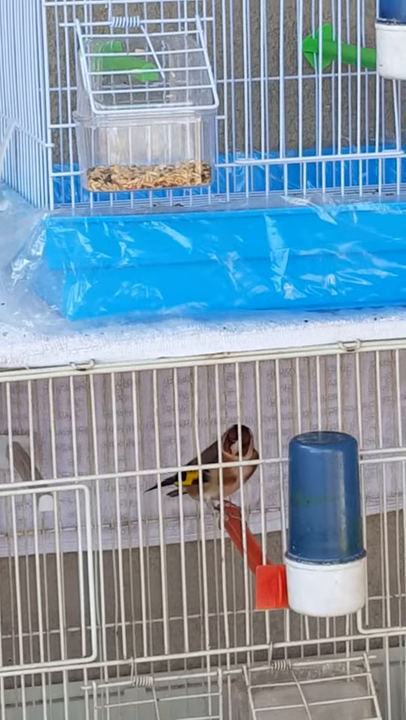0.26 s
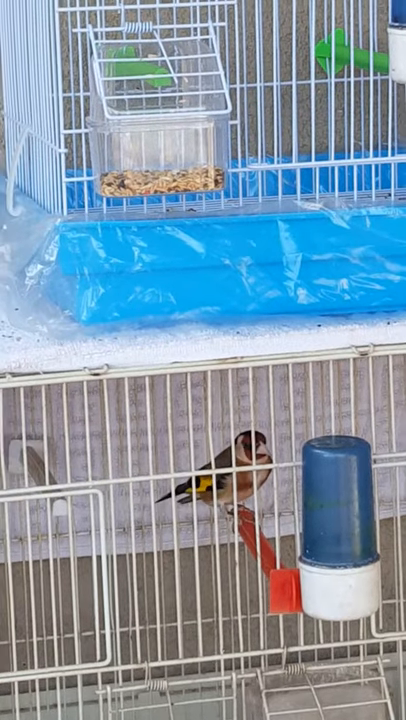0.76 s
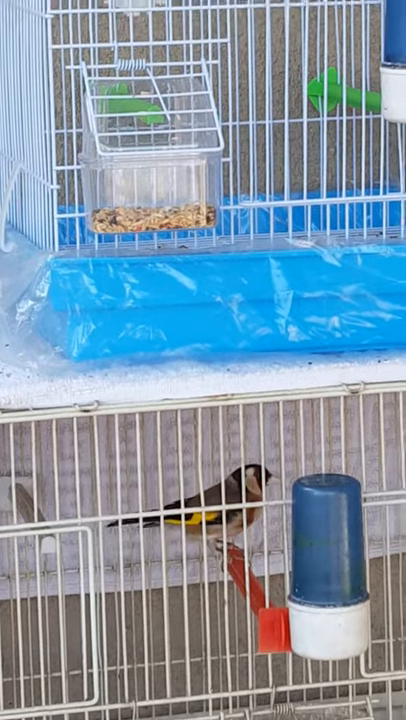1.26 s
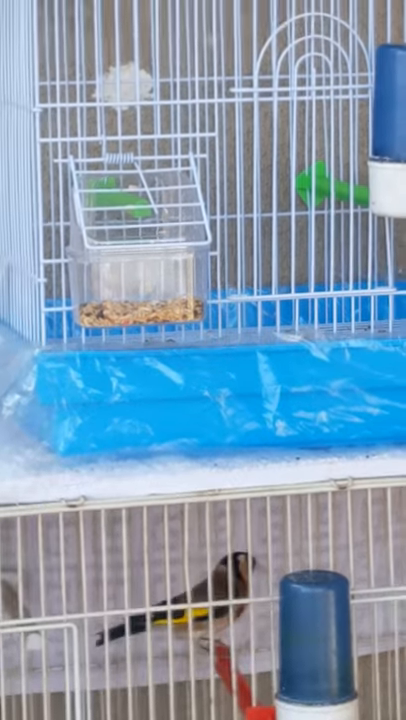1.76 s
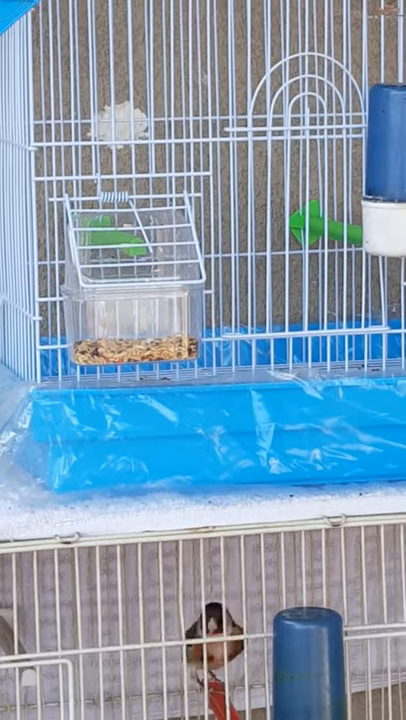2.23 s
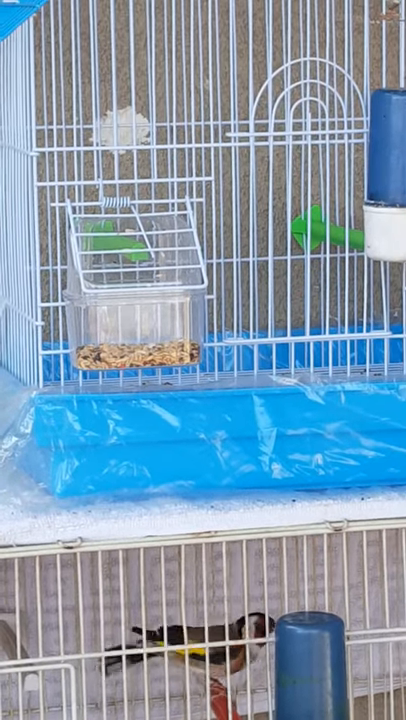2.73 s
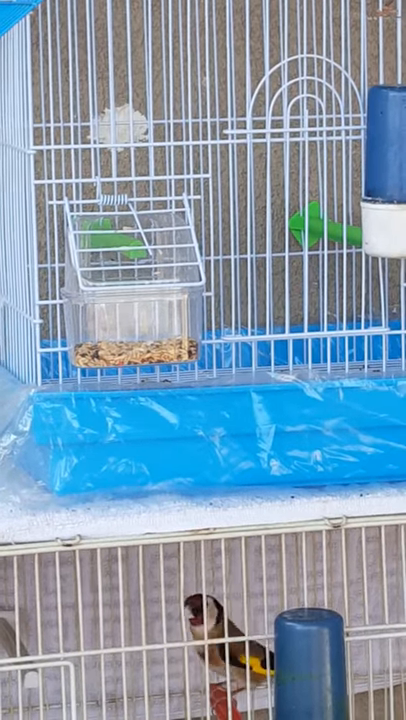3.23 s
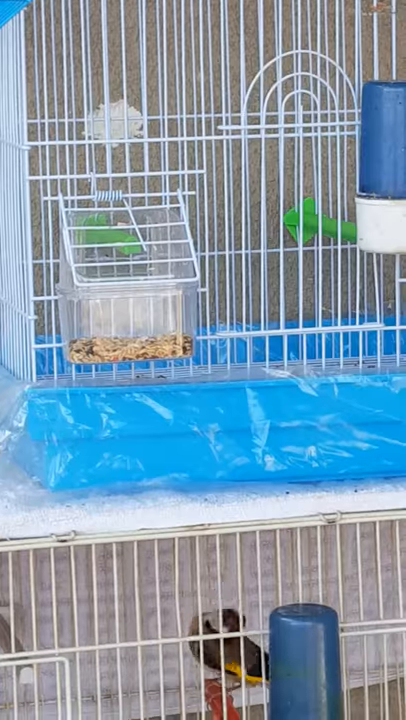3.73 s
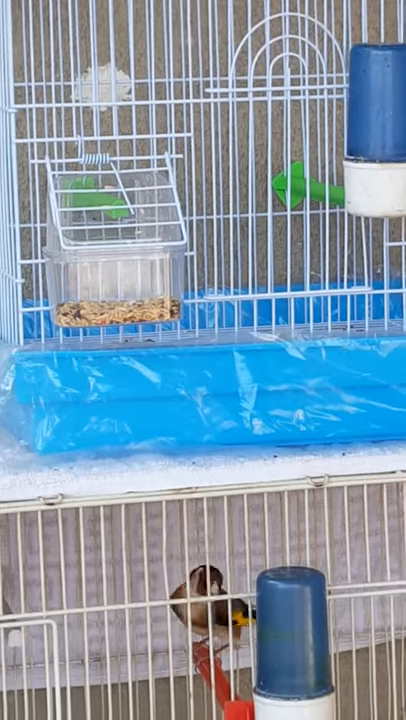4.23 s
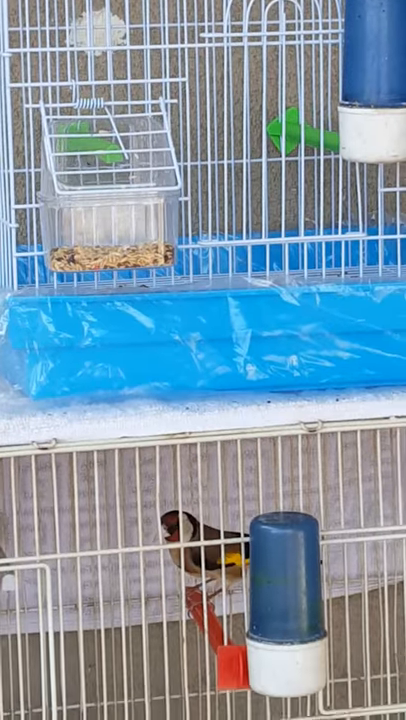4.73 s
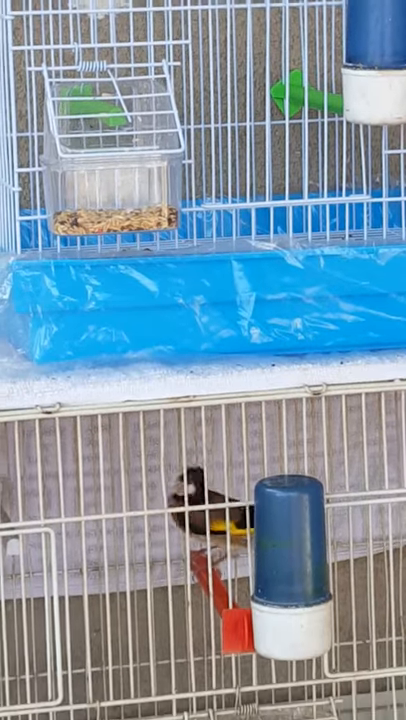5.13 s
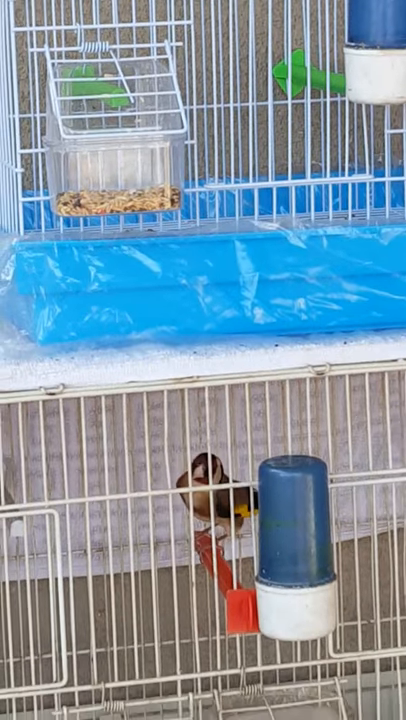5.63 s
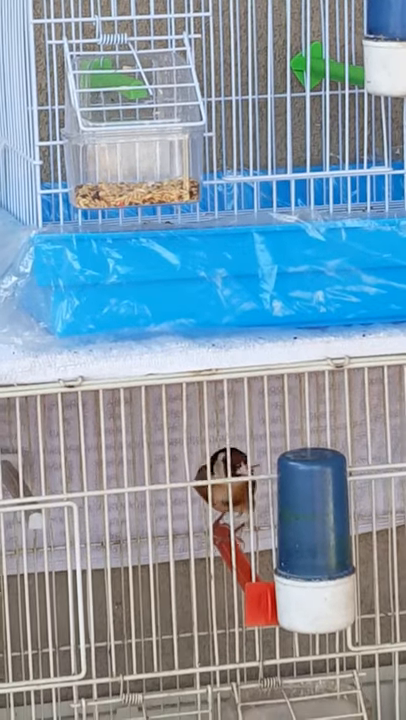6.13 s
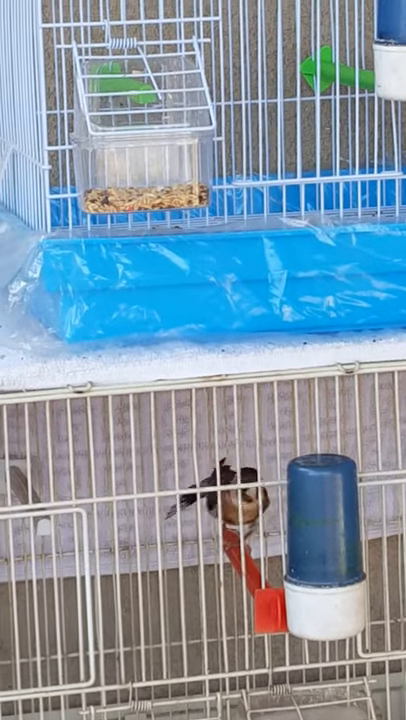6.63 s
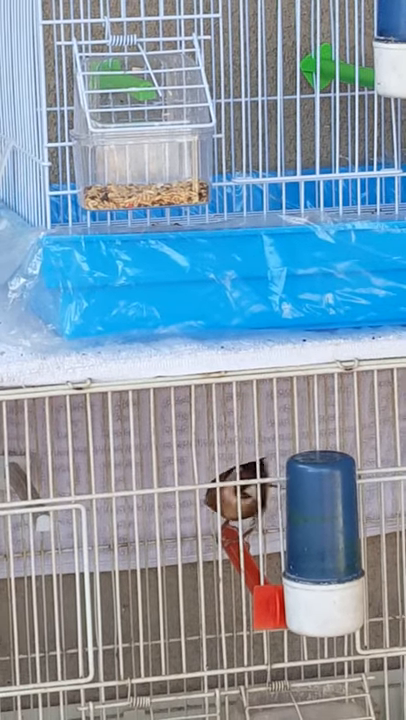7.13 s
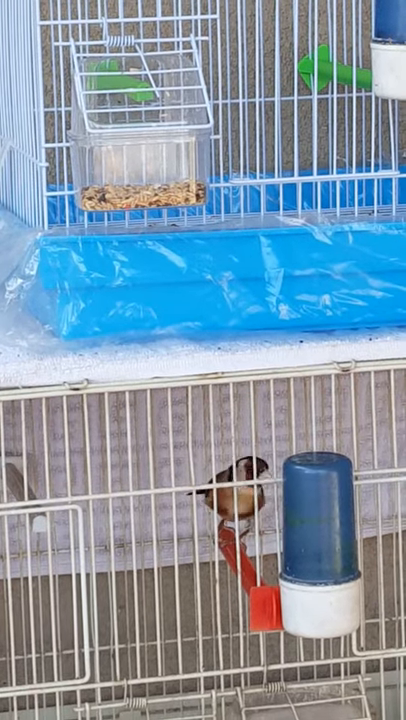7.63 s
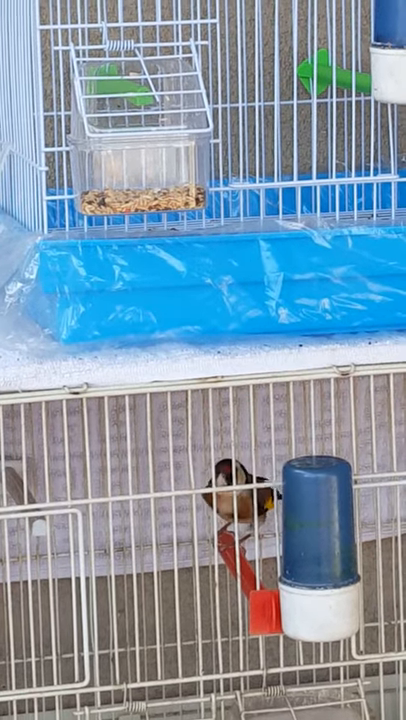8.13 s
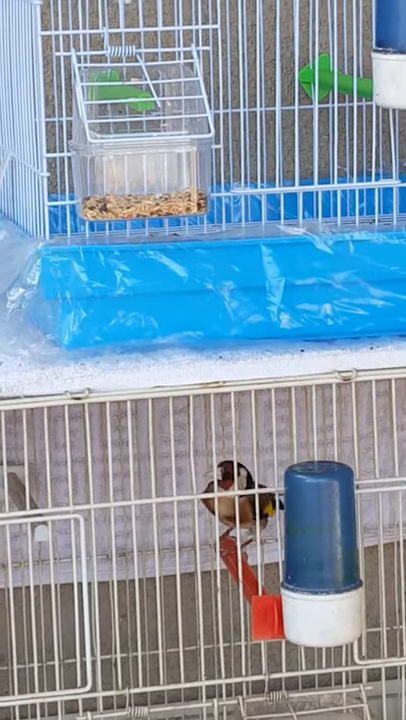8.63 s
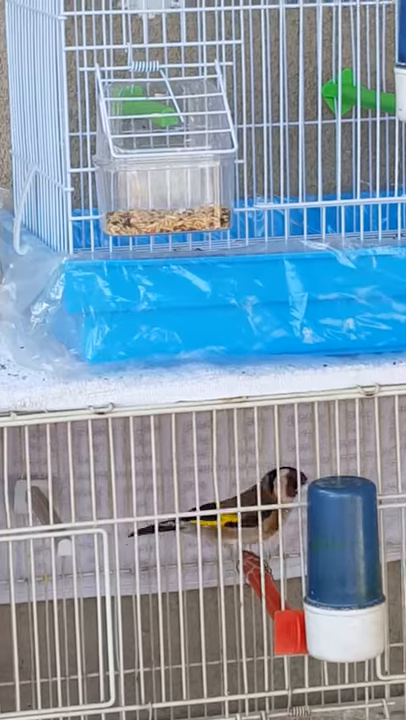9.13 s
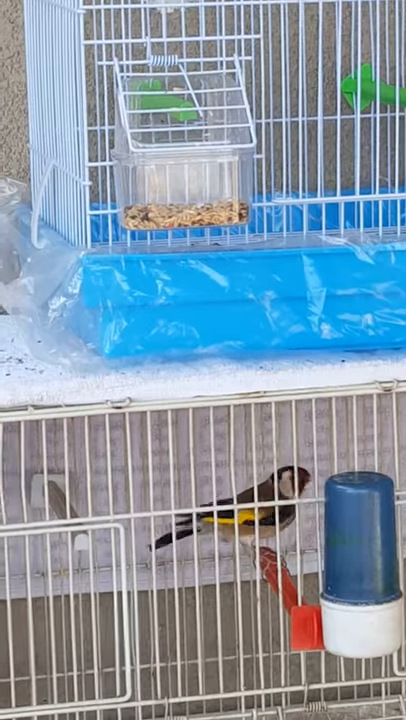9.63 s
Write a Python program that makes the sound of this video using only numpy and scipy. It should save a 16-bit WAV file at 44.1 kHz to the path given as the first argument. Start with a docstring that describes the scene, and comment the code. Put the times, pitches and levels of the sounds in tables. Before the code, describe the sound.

Sharp chirps and raspy squeaks from a small finch indoors, with faint cage ticks over a low hum and hiss.

```python
"""A caged goldfinch gives four bright twitters and two creaking phrases in a hard-walled room.
Each phrase ends in a whine, in which the two sides of the syrinx sound together and modulate each
other, producing sum and difference tones. Reflections from near walls smear every note.
Claws and beak excite ticks in the cage, and a plucked bar rings in its normal modes. Far birds and
rustles arrive as diffuse sound, over a steady rush, hiss, hum and deep rumble."""
import sys
import numpy as np
from scipy import signal
from scipy.fft import rfft, irfft, next_fast_len
from scipy.io import wavfile

SR = 44100
rng = np.random.default_rng(int(sys.argv[2]) if len(sys.argv) > 2 else 0)


def dump_mix(stems):
    """Bounce the given channels to the path in sys.argv[1] as a 16-bit WAV at rate SR."""
    frames = np.atleast_2d(stems).T  # one column per channel
    limited = np.clip(frames, -1, 1)  # hard clip at full scale
    pcm = np.round(limited * 32767).astype(np.int16)
    wavfile.write(sys.argv[1], SR, pcm)


N = 435266
TIME = np.arange(N) / SR

# spectra of the rush (in phase and in antiphase at the two ports), hiss and rumble: f/Hz, density/dB
RUSH_IN_PHASE = [(15, -35), (25, -10.5), (49, 0), (75, -11), (102, 3), (129, -4.5), (167, 1), (266, -3.5),
                 (316, -3), (437, -9), (476, -7), (575, -9), (1030, -7.5), (1500, -14), (1950, -41.5),
                 (3300, -120)]
RUSH_ANTIPHASE = [(15, -44), (25, -16.5), (113, -4.5), (236, -5), (280, -3), (460, -4.5), (1180, 0.5),
                  (1500, -5), (1950, -16.5), (3300, -120)]
HISS_SPECTRUM = [(880, -43), (1500, 1.5), (2480, -3.5), (2740, -6), (4390, -11), (5240, -14), (5620, -13.5),
                 (6020, -18.5), (7620, -23), (9190, -29.5), (15800, -25.5)]
RUMBLE_SPECTRUM = [(15, -4), (26, -1), (48, 15.5), (62, 8.5), (78, -6.5), (105, -3.5), (135, -8), (180, -3),
                   (300, -36.5)]
# slow envelopes of hiss and rumble: t/s, level/dB
HISS_LEVEL = [(0, -58.5), (2.4, -59), (4.2, -57), (5.6, -59), (7.5, -57), (8.6, -60), (9.87, -57.5)]
RUMBLE_LEVEL = [(0, -62.5), (2.5, -64), (5.5, -59.5), (7.4, -56.5), (8.2, -59.5), (9.87, -59)]
# hum of the building: f/Hz, phase wander rate/Hz, level/dB
HUM_PARTIALS = [(51, 8, -77), (114.7, 8.3, -72), (173.6, 7.1, -73.5)]
# whistles of distant birds: t/s, duration/s, start f/Hz, end f/Hz, level/dB
FAR_WHISTLES = [(0.021, 1.8, 5630, 5560, -74.5), (0.376, 0.25, 4170, 4310, -66),
                (2.415, 0.22, 4290, 4210, -64.5), (3.772, 0.73, 6880, 6450, -70),
                (5.33, 0.15, 3010, 3070, -58.5), (6.498, 0.14, 2970, 3030, -57)]
# distant rustles: t/s, duration/s, centre f/Hz, level/dB
RUSTLES = [(0.729, 0.16, 2120, -55), (1.215, 0.6, 4200, -69.5), (3.876, 0.57, 4700, -70.5),
           (7.455, 0.5, 3950, -62)]
# ticks on perch and bars, and plucks of a bar: t/s, level/dB
TICKS = [(1.476, -49.5), (1.6876, -48.5), (2.3411, -49), (3.22, -41), (4.2318, -52), (6.224, -58),
         (8.4068, -57), (9.0957, -53), (9.1303, -45), (9.1894, -57)]
PLUCKS = [(1.477, -51), (4.202, -52.5)]
# spectra of a tick and of the rasp in the voice: f/Hz, density/dB
TICK_SPECTRUM = [(1000, -24), (2400, -3), (4800, -10), (7500, 0), (10500, -7.5), (13000, -12),
                 (16000, -13.5)]
RASP_SPECTRUM = [(2000, -16.5), (4500, 3), (7500, -4), (10500, -4), (15000, -6.5)]
# normal modes of a cage bar: f/Hz, relative level/dB, T60/s
BAR_MODES = [(1436, -4, .08), (2366, 3, .1), (3530, -4, 0.11), (5030, -11, .07), (5250, -12, .07),
             (6300, -15, .06), (8620, -12, .06)]
# phrases of creak, pip and whine: t/s, creak and whine gain/dB, pip level/dB, whine duration/s,
# upper voice decay/(dB/s), upper voice held f/Hz
PHRASES = [(2.673, 0, -16.5, .33, 60, 5826), (6.64, .5, -18, 0.294, 25, 5870)]
# hoarse glides of a creak (t from the start of its phrase) and soft notes between the calls:
# t/s, duration/s, start f/Hz, end f/Hz, level/dB, step per harmonic/dB, rasp (0-1)
CREAK_GLIDES = [(.000, 0.087, 1341, 1914, -45.5, -0.5, .22), (0.038, .065, 1900, 2505, -39, -3.5, 0.3),
                (.022, 0.053, 3150, 3760, -36, -22, 0.2), (0.019, 0.045, 7600, 6380, -47.5, -18, 1),
                (.025, 0.055, 4220, 4680, -42, -6, .5), (0.107, 0.0205, 3590, 3130, -39, -36, 0.2),
                (0.121, 0.024, 2660, 2865, -41.5, -7, 0), (0.151, 0.031, 2590, 2917, -36, -3.5, 0.43),
                (0.154, .030, 3196, 3620, -26, -21, .1), (.180, 0.036, 2720, 3030, -28.5, -33, .15),
                (0.238, .022, 2190, 3287, -32, -2.5, 0.88), (0.249, .020, 3032, 5404, -29, -17.5, 0.4),
                (.262, .025, 5020, 5280, -34.5, -24.5, 0.7)]
MURMURS = [(5.015, .025, 5600, 5750, -64, -23, .2), (7.445, 0.053, 4730, 4420, -57, -10, 0.46),
           (7.53, .066, 4560, 4250, -52.5, -11.5, .3), (7.935, .044, 5850, 6390, -54, -9, 0.53),
           (7.968, 0.0215, 2090, 3320, -43.5, -10, 0.8), (8.003, 0.0375, 4100, 3650, -38.5, -17, 0.45)]
# twitters, two arches and then a run of downward slurs: t/s, delay of first slur/s, slur count,
# first spacing/s, slur level/dB, fade over the run/dB, slur overtone gain/dB
TWITTERS = [(4.578, .0855, 5, 0.046, -11.5, 4.5, -1.5), (5.658, 0.081, 4, 0.047, -13.5, 6.5, 5),
            (7.745, .0835, 2, .0465, -13, 1, -2), (9.375, 0.083, 3, 0.049, -12, 2.5, -3.5)]
# opening arches: t in the twitter/s, duration/s, top f/Hz, level/dB, overtone gain/dB, rasp/dB
OPENING_ARCHES = [(0, .030, 3446, -14, 8, -30), (0.03, 0.027, 4129, -15, 5, -29)]
# contours of an arch and a slur: t/duration, f/top f, effort/dB
ARCH_CONTOUR = [(0, .75, -26), (.17, .89, -6), (.42, .98, -1), (.62, 1, 0), (.8, .92, -3), (.92, .76, -10),
                (1, .62, -28)]
SLUR_CONTOUR = [(0, 1, -24), (.14, .99, -4), (.35, .958, 0), (.55, .885, -1), (.72, .77, -3),
                (.86, .6, -14), (1, .43, -29)]
# overtones of the clear notes: harmonic number, relative level/dB
CLEAR_OVERTONES = [(2, -28.5), (3, -28), (4, -44.5)]
# diffuse tails of near walls, room and the space beyond: T60/s, level/dB, treble gain/dB
REVERB_TAILS = [(.1, -3, 1), (.4, -9, -3), (1.1, -20, -6)]
# direct path, then early reflections: delay/s, left gain, right gain, lag at the right port/s
PATHS = [(0, 0.93, 0.83, .000145), (.0013, .15, 0.39, .00005), (.0034, .15, 0.18, -.00008),
         (.0055, .33, .15, .00018), (.0066, 0.21, 0.27, .00002)]
# frequency response of each microphone port: f/Hz, gain/dB
LEFT_PORT = [(1500, -4), (3300, -1), (4000, 1), (4600, 2.5), (5700, -2.5), (6300, -2), (7500, -2),
             (9100, -2), (10500, -11), (14000, -4), (16000, -3)]
RIGHT_PORT = [(1500, 1), (3300, 0), (4000, 4), (4600, 2), (5700, 5.5), (6300, 0.5), (7500, -0.5),
              (9100, -17.5), (10300, -12), (14000, -6.5), (16000, -8)]


def from_db(db):
    """Amplitude ratio: a factor of ten for every 20 dB."""
    return 10 ** (np.asarray(db) / 20)


def unit_rms(x):
    """Normalisation to unit mean power."""
    return x / np.sqrt(np.mean(x ** 2) + 1e-20)


def coloured(x, spectrum):
    """Linear filtering: the spectrum is multiplied by a curve of f/Hz, gain/dB."""
    size = next_fast_len(x.shape[-1] + 2048)
    hz, db = np.transpose(spectrum)
    bins = np.maximum(np.fft.rfftfreq(size, 1 / SR), 1)
    gain = from_db(np.interp(np.log(bins), np.log(hz), db))
    return irfft(rfft(x, size) * gain, size)[..., :x.shape[-1]]


def noise(spectrum, size):
    """Spectral shaping of white noise, at unit power."""
    return unit_rms(coloured(rng.standard_normal(size), spectrum))


def wander(rate_hz, size):
    """Random modulation: linear interpolation between Gaussian values of unit variance."""
    steps = np.arange(size) * rate_hz / SR
    return np.interp(steps, np.arange(size), rng.standard_normal(size))


def add(track, start, sound):
    """Superposition of a sound on a track, from a start time in seconds."""
    at = max(round(start * SR), 0)
    track[at:at + len(sound)] += sound[:N - at]


def phase_of(hz):
    """Phase is the time integral of angular frequency."""
    return 2 * np.pi * np.cumsum(hz) / SR


def harmonics(hz, partials):
    """Fourier series on a moving fundamental, kept below the Nyquist frequency."""
    phase = phase_of(hz)
    return sum(from_db(db) * np.sin(round(k) * phase) * (k * hz < SR / 2) for k, db in partials)


def envelope(t, length, attack_s, release_s):
    """Amplitude envelope with sine-squared attack and release."""
    rise = np.sin(np.pi / 2 * np.clip(t / attack_s, 0, 1))
    fall = np.sin(np.pi / 2 * np.clip((length - t) / release_s, 0, 1))
    return (rise * fall) ** 2


def background(rush_db=-50.5, fall_db_per_s=.1, waver_db=.42, hiss_right_db=1.5):
    """Partial coherence: rush and hiss have in-phase and antiphase parts; the hum is all in phase."""
    antiphase = np.array([[1], [-1]])
    rush = noise(RUSH_IN_PHASE, N) + from_db(-8.5) * noise(RUSH_ANTIPHASE, N) * antiphase
    hiss = unit_rms(noise(HISS_SPECTRUM, N) + from_db(-.5) * noise(HISS_SPECTRUM, N) * antiphase)
    rush *= from_db(rush_db - fall_db_per_s * TIME + waver_db * wander(4.2, N))
    hiss *= from_db(np.interp(TIME, *np.transpose(HISS_LEVEL)) - hiss_right_db / 2 * antiphase)
    hum = sum(from_db(db) * unit_rms(np.sin(2 * np.pi * hz * TIME + wander(rate_hz, N)))
              for hz, rate_hz, db in HUM_PARTIALS)
    return rush + hiss + hum


def rumble():
    """Long wavelengths give the same pressure at both ports."""
    return from_db(np.interp(TIME, *np.transpose(RUMBLE_LEVEL))) * noise(RUMBLE_SPECTRUM, N)


def far_chatter(count=40, until_s=4.5, length_s=.1, low_hz=3600, high_hz=5100, db=-71):
    """Faint notes of distant birds, uniformly distributed in onset and frequency."""
    draws = rng.uniform((0, low_hz), (until_s, high_hz), (count, 2))
    return [(start, length_s, hz, hz, db) for start, hz in draws]


def far_whistles(jitter=.018):
    """Random frequency modulation broadens the thin tones of distant birds."""
    out = np.zeros(N)
    for start, length, from_hz, to_hz, db in FAR_WHISTLES + far_chatter():
        size = int(length * SR)
        hz = np.linspace(from_hz, to_hz, size) * (1 + jitter * wander(500, 2 * SR)[:size])
        add(out, start, from_db(db) * signal.windows.tukey(size, .5) * np.sin(phase_of(hz)))
    return out


def rustles(skirt_db_per_octave=-22, flutter_db=3):
    """Random amplitude modulation makes short swells of band-limited noise flutter."""
    out = np.zeros(N)
    for start, length, hz, db in RUSTLES:
        size = int(length * SR)
        band = [(hz * 2 ** octave, skirt_db_per_octave * abs(octave)) for octave in range(-2, 3)]
        fluttering = noise(band, SR) * from_db(db + flutter_db * wander(70, SR))
        add(out, start, fluttering[:size] * signal.windows.tukey(size, .5))
    return out


def cage_ticks(t60=.027, gain_db=-5):
    """Impacts of claws and beak excite broadband bursts that decay exponentially."""
    out, t = np.zeros(N), np.arange(4096) / SR
    for start, db in TICKS:
        add(out, start, from_db(gain_db + db - 60 * t / t60) * noise(TICK_SPECTRUM, len(t)))
    return out


def plucked_bars(spread_db=2.4):
    """Free vibration is a sum of damped normal modes; each pluck weights them a little differently."""
    out, t = np.zeros(N), np.arange(SR // 2) / SR
    for start, db in PLUCKS:
        for hz, mode_db, t60 in BAR_MODES:
            gain = from_db(db + mode_db + rng.normal(0, spread_db) - 60 * t / t60)
            add(out, start, gain * np.sin(2 * np.pi * hz * t))
    return out


def hoarse_notes(notes, jitter=.09, shimmer=.65, flutter_hz=1400, rolloff_db=-.73):
    """Aperiodic vibration of slack membranes: uneven cycles spread the harmonics into noise."""
    out = np.zeros(N)
    for start, length, from_hz, to_hz, db, step_db, rasp in notes:
        size = int(length * SR)
        hz = np.linspace(from_hz, to_hz, size) * (1 + jitter * rasp * wander(flutter_hz, 8192)[:size])
        swell = from_db(db) * np.sin(np.linspace(0, np.pi, size))
        flutter = 1 + shimmer * rasp * wander(flutter_hz, 8192)[:size]
        partials = [(k + 1, k * step_db + k * k * rolloff_db) for k in range(6)]
        add(out, start, swell * flutter * harmonics(hz, partials))
    return out


def creaks():
    """Superposed hoarse glides form the creak that opens each phrase."""
    return hoarse_notes([(start + after, length, from_hz, to_hz, db + gain_db, step_db, rasp)
                         for start, gain_db, *_ in PHRASES
                         for after, length, from_hz, to_hz, db, step_db, rasp in CREAK_GLIDES])


def pips(after_s=.265, start_hz=6305, sag_hz_per_s=2000, decay_db_per_s=130, jitter=.002):
    """A nearly pure tone with exponential decay ends each creak."""
    out, t = np.zeros(N), np.arange(4096) / SR
    for start, _, db, *_ in PHRASES:
        hz = (start_hz - sag_hz_per_s * t) * (1 + jitter * wander(490, len(t)))
        gain = from_db(db - decay_db_per_s * t) * envelope(t, .034, attack_s=.006, release_s=.012)
        add(out, start + after_s, gain * harmonics(hz, [(1, 0), (2, -24)]))
    return out


def syrinx_side(hz, db, held_jitter=.0015, glide_jitter=.05, waver_db=1.6):
    """Phase and amplitude of one oscillator, whose jitter subsides as its frequency falls."""
    strain = np.log(hz / hz.min())
    jittered_hz = hz * (1 + (held_jitter + glide_jitter * strain ** 2) * wander(508, len(hz)))
    return phase_of(jittered_hz), from_db(db + waver_db * wander(29.7, len(hz)))


def whine(length, decay_db_per_s, held_hz, low_rest_hz=3496, sag_hz_per_s=550, roughness=.3):
    """Nonlinear coupling: the two voices of the syrinx mix into sum and difference tones."""
    t = np.arange(SR // 2) / SR
    # both voices drop at the onset, and bend towards each other at the release
    high_drop_hz = 595 * np.exp(-(t / .028) ** 2)
    low_drop_hz = 2050 * np.exp(-t / .042)
    release = np.exp(np.minimum(t - length, 0) / .025)
    high_hz = held_hz + high_drop_hz - sag_hz_per_s * t - 160 * release
    low_hz = low_rest_hz + low_drop_hz + 170 * release
    high, high_gain = syrinx_side(high_hz, db=-27.5 - decay_db_per_s * t)
    low, low_gain = syrinx_side(low_hz, db=-34.5 - 28 * t)
    high_gain *= envelope(t, length, attack_s=.04, release_s=.033)
    low_gain *= envelope(t, length, attack_s=.03, release_s=.042)
    upper_voice = high_gain * (np.sin(high) + from_db(-24.5) * np.sin(2 * high))
    lower_voice = low_gain * (np.sin(low) + from_db(-21.5) * np.sin(2 * low))
    coupling = np.sqrt(high_gain * low_gain) * (1 + roughness * wander(900, len(t)))
    quadratic = from_db(-18.5) * np.sin(high + low) + from_db(-23.5) * np.sin(high - low)
    cubic = from_db(-30) * (np.sin(2 * high - low) + np.sin(high + 2 * low) + np.sin(2 * high + low))
    return upper_voice + lower_voice + coupling * (quadratic + cubic)


def whines(after_s=.311):
    """Biphonation, two voices at once, closes each phrase."""
    out = np.zeros(N)
    for start, gain_db, _, length, decay_db_per_s, held_hz in PHRASES:
        add(out, start + after_s, from_db(gain_db) * whine(length, decay_db_per_s, held_hz))
    return out


def clear_notes(notes, contour, jitter, overtone_jitter, brightening=.35):
    """Frequency-modulated whistles with a faint rasp; overtones grow faster than the fundamental."""
    out = np.zeros(N)
    share, bend, contour_db = np.transpose(contour)
    for start, length, top_hz, db, overtone_db, rasp_db in notes:
        size = int(length * SR)
        progress = np.linspace(0, 1, size)
        hz = top_hz * np.interp(progress, share, bend) * (1 + jitter * wander(1500, 4096)[:size])
        effort_db = np.interp(progress, share, contour_db)
        gain = from_db(db + effort_db) * signal.windows.tukey(size, .1)
        frayed_hz = hz * (1 + overtone_jitter * wander(2500, 4096)[:size])
        overtones = from_db(overtone_db + brightening * effort_db) * harmonics(frayed_hz, CLEAR_OVERTONES)
        rasp = from_db(rasp_db) * noise(RASP_SPECTRUM, 4096)[:size]
        add(out, start, gain * (np.sin(phase_of(hz)) + overtones + rasp))
    return out


def arches():
    """Two notes that rise and fall in frequency open every twitter."""
    return [(start + after, *note) for start, *_ in TWITTERS for after, *note in OPENING_ARCHES]


def voice_breaks(db=-39, length_s=.017):
    """A noise transient marks the jump of the voice from the first arch to the second."""
    out, size = np.zeros(N), int(length_s * SR)
    for start, arch_length, *_ in arches()[::2]:
        burst = noise(RASP_SPECTRUM, 4096)[:size] * np.hanning(size)
        add(out, start + arch_length - length_s / 2, from_db(db) * burst)
    return out


def slurs(length_s=.0235, first_hz=4760, sink_hz=69.8, slowing_s=.0025, rasp_db=-33):
    """A train of downward sweeps, no two alike, whose rate, level and frequency decline."""
    notes = []
    for start, after, count, spacing, db, fade_db, overtone_db in TWITTERS:
        for k, progress in enumerate(np.linspace(0, 1, round(count))):
            onset = start + after + k * spacing + slowing_s * k * (k - 1) / 2
            length = length_s * rng.normal(1, .05)
            top_hz = (first_hz - sink_hz * progress ** 2) * rng.normal(1, .004)
            notes.append((onset, length, top_hz, db - fade_db * progress ** 2, overtone_db, rasp_db))
    return notes


def room(near, far, build_up_s=.0074):
    """Convolution gives all sounds diffuse tails; only near ones have direct paths and early echoes."""
    t, tails = np.arange(SR) / SR, 0
    for t60, db, treble_db in REVERB_TAILS:
        # the longer the path, the more treble the walls and air absorb
        diffuse = coloured(rng.standard_normal((2, len(t))), [(4380, 0), (5900, treble_db)])
        decay = from_db(-60 * t / t60) * np.clip(t / build_up_s, 0, 1)
        tails = tails + from_db(db) * diffuse * decay / np.linalg.norm(decay)
    left, right = signal.fftconvolve((near + far)[None], tails, axes=1)[:, :N]
    for delay, left_gain, right_gain, lag in PATHS:
        add(left, delay, left_gain * near)
        add(right, delay + lag, right_gain * near)
    return np.array([coloured(left, LEFT_PORT), coloured(right, RIGHT_PORT)])


def scene():
    """Superposition of bird, cage and distant sounds in the room with the background."""
    twitters = clear_notes(arches(), ARCH_CONTOUR, jitter=.006, overtone_jitter=.01)
    twitters += clear_notes(slurs(), SLUR_CONTOUR, jitter=.007, overtone_jitter=.032)
    twitters += voice_breaks()
    phrases = creaks() + pips() + whines()
    near = twitters + phrases + hoarse_notes(MURMURS) + cage_ticks() + plucked_bars()
    far = far_whistles() + rustles()
    return room(near, far) + background() + rumble()


def record(dry, cutoff_hz=15900):
    """Band limiting by a steep elliptic low-pass filter."""
    return signal.sosfilt(signal.ellip(12, .1, 80, cutoff_hz, fs=SR, output="sos"), dry)


dry = scene()
out = record(dry)
dump_mix(out)
```